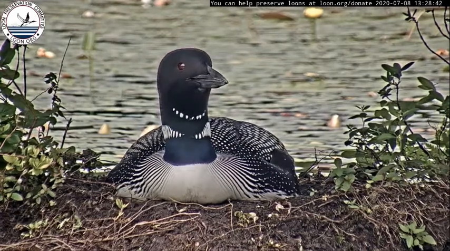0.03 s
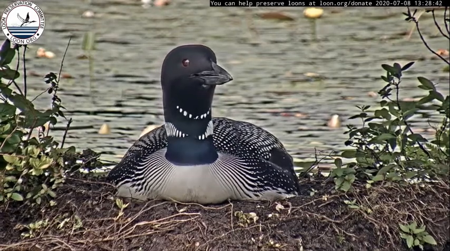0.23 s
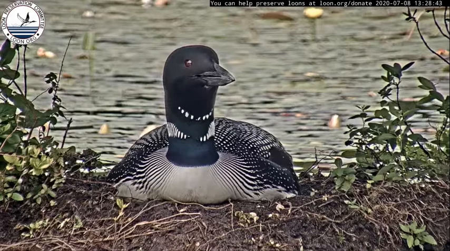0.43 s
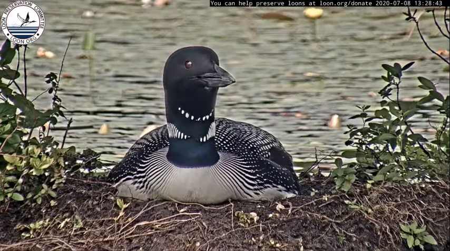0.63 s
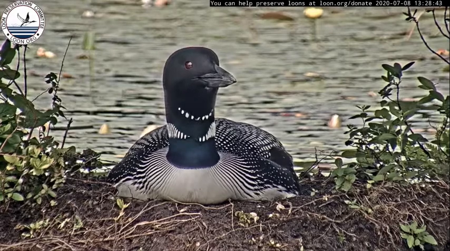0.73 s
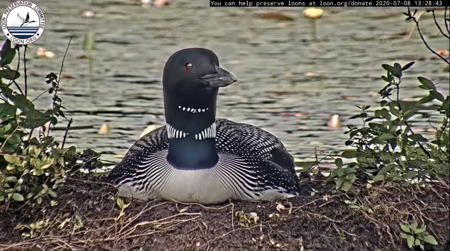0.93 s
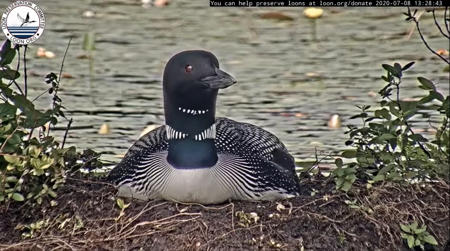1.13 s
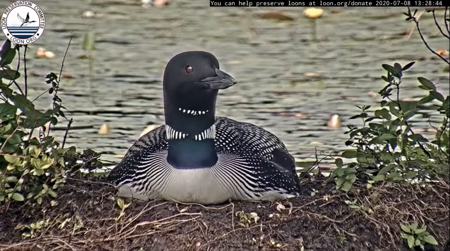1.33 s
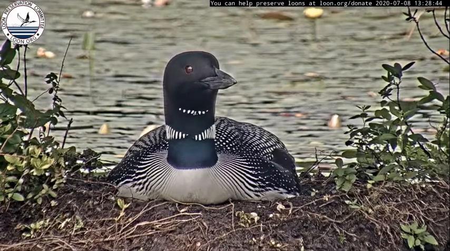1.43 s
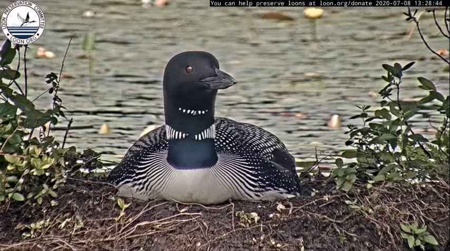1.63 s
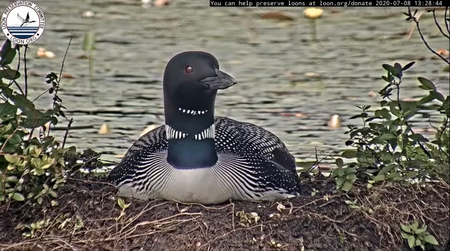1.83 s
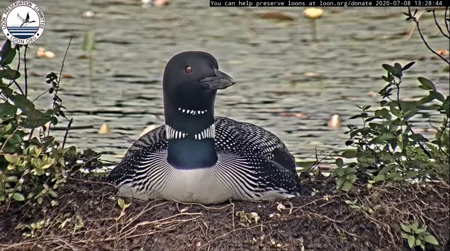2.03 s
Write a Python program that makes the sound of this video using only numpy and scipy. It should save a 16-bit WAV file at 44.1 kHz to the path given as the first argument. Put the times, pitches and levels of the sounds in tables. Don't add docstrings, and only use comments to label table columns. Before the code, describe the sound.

A loon's single loud wail dominates, close and nearly dry. A faint songbird slurs downward at 0 s over quiet lake hiss. The wail rises softly at 0.13, jumps to a low note at 0.2, flips to a long high note from 0.38 to 0.93, with a tiny click at 0.52, then falls and stops near 1.03. Faint wavering echoes follow, with distant trilling at 1.25, peeps and chips from 1.6, and a falling whistle near 2.

```python
import sys
import numpy as np
from scipy import signal
from scipy.io import wavfile
from scipy.ndimage import uniform_filter1d

SR = 44100
rng = np.random.default_rng(int(sys.argv[2]) if len(sys.argv) > 2 else 0)


def transcribe(u):
    v = np.clip(np.atleast_2d(u).T, -1, 1)
    q = np.round(v * 32767).astype(np.int16)
    wavfile.write(sys.argv[1], SR, q)


def voltage_ratio(level):
    return 10 ** (np.asarray(level, float) / 20)


N = 92610
STUTTER_S = .5233


def curve(rows, col):
    rows = np.array(rows)
    return np.interp(np.arange(N) / SR, rows[:, 0], rows[:, col])


def band(x, hz, width):
    return signal.lfilter(*signal.iirpeak(hz, hz / width, SR), x)


def unit(x):
    return x / np.sqrt(np.mean(x ** 2))


def walk(rate):
    k = int(SR / rate)
    steps = np.repeat(rng.standard_normal(N // k + 1), k)
    return 1.5 * uniform_filter1d(uniform_filter1d(steps, k), k)[:N]


def tail(x, t60, late, top_hz):
    t = np.arange(N) / SR
    h = rng.standard_normal(N) * voltage_ratio(-60 * t / t60) * np.clip(t / late, 0, 1) ** 2
    h = signal.lfilter(*signal.butter(1, top_hz, fs=SR), h)
    return signal.fftconvolve(x, h / np.sqrt(np.sum(h ** 2)))[:N]


def whistle(rows, fade):
    t = np.arange(N) / SR
    since_start = t - rows[0][0] + fade / 2
    until_end = rows[-1][0] + fade / 2 - t
    gate = np.clip(np.minimum(since_start, until_end) / fade, 0, 1)
    turn = np.cumsum(uniform_filter1d(curve(rows, 1), 150)) / SR
    return np.sqrt(2) * gate * voltage_ratio(curve(rows, 2)) * np.sin(2 * np.pi * turn)


# (frequency [Hz], level per Hz [dB])
LAKE_SPECTRUM = [(15, -33), (25, -11), (127, -2.5), (632, -17), (922, -15.5), (1060, -33), (1280, -28.5),
                 (2310, -19.5), (7000, -42), (9100, -64), (15400, -120)]
LAKE_DB = -65


def lake():
    out, swell, shape = 0, walk(3.6), np.array(LAKE_SPECTRUM)
    for hz in 30 * 2 ** np.arange(0, 8.1, .5):
        db = np.interp(np.log(hz), np.log(shape[:, 0]), shape[:, 1]) + 10 * np.log10(hz)
        flicker_db = 0.57 + 0.63 * (hz < 300)
        db = db + 0.67 * swell + flicker_db * walk(10)
        out = out + voltage_ratio(db) * unit(band(rng.standard_normal(N), hz, hz / 3))
    return voltage_ratio(LAKE_DB) * unit(out)


# (time [s], level [dB])
CHIPS = [(1.686, -73), (1.808, -74), (1.928, -75), (2.05, -77)]
CHIP_S, CHIP_TOP_HZ, CHIP_END_HZ, CHIP_BEND_S = .028, 5350, 3200, .017


def chips():
    out = 0
    for s, db in CHIPS:
        rows = []
        for u in np.linspace(0, CHIP_S, 8):
            hz = CHIP_END_HZ + (CHIP_TOP_HZ - CHIP_END_HZ) * np.exp(-u / CHIP_BEND_S)
            rows.append((s + u, hz, db - 2.0 + 3 * u / CHIP_S))
        out = out + whistle(rows, 0.0039)
    return out


# (time [s], level [dB])
PEEPS = [(1.62, -77.5), (1.71, -89), (1.74, -78), (1.875, -76), (1.906, -78.5)]
PEEP_S, PEEP_HZ = 0.013, 2340


def peeps():
    return sum(whistle([(s, PEEP_HZ, db), (s + PEEP_S, PEEP_HZ, db)], .008) for s, db in PEEPS)


# (time [s], pitch [Hz], level [dB])
SLUR_A = [(0.0, 2630, -68), (0.012, 2598, -62), (0.028, 2348, -63), (0.04, 2190, -69), (0.086, 1815, -71.5),
          (0.124, 1600, -73.5), (0.135, 1540, -79.5)]
SLUR_B = [(1.945, 2900, -90), (1.958, 2918, -86), (1.976, 2839, -73), (2.005, 2720, -70.5),
          (2.028, 2560, -61), (2.067, 1993, -70.5), (2.1, 1700, -67.5)]
SLUR_C = [(.1, 4250, -82), (.11, 4250, -73), (.122, 4240, -84), (.135, 4200, -75), (.155, 4000, -88),
          (.172, 3800, -75), (.182, 3720, -83), (.193, 3650, -74), (.205, 3150, -76), (.212, 3000, -88)]
TRILLED_CALL = [(1.25, 2873, -89), (1.27, 2950, -75), (1.292, 3330, -71), (1.34, 3295, -76),
                (1.36, 3297, -66), (1.385, 3297, -68), (1.415, 3310, -74), (1.435, 3290, -85),
                (1.465, 3290, -78), (1.49, 3290, -88)]
HIGH_CALL = [(1.24, 3650, -81), (1.27, 3780, -83), (1.293, 4120, -78), (1.305, 4200, -90),
             (1.325, 4080, -79), (1.342, 4100, -92), (1.365, 4130, -79), (1.383, 4130, -92),
             (1.4, 4100, -79), (1.43, 3720, -83), (1.46, 3660, -78), (1.483, 3600, -80), (1.495, 3450, -78),
             (1.51, 3400, -86)]
TRILL_HZ, TRILL_DEPTH = 154, 0.54
WOOD_DB, WOOD_T60_S = -9.5, 1


def songbirds():
    out = sum(whistle(rows, 0.00789) for rows in (SLUR_A, SLUR_B, SLUR_C, HIGH_CALL))
    trill_turn = np.cumsum(TRILL_HZ * (1 + 0.11 * walk(17))) / SR
    out = out + whistle(TRILLED_CALL, .008) * (1 + TRILL_DEPTH * np.sin(2 * np.pi * trill_turn))
    out = out * voltage_ratio(1.2 * walk(40))
    out = out + chips() + peeps()
    return out + voltage_ratio(WOOD_DB) * tail(out, WOOD_T60_S, 0.015, 5000)


# (time [s], level [dB])
FAR_SWAY = [(1.04, 1), (1.09, -1), (1.124, -8.5), (1.15, 3), (1.22, 1), (1.26, -2), (1.3, -2.5), (1.38, 0),
            (1.5, -4), (1.54, 0.5), (1.59, -6), (1.655, 1), (1.69, -5), (1.75, 1.5), (1.78, -7.5), (1.9, 3),
            (2.0, -2)]


def sway_far(x):
    return voltage_ratio(curve(FAR_SWAY, 1)) * x


# (delay [s], level [dB])
FAR_ECHOES = [(.21, -52.5), (.33, -55.5), (.52, -45), (.75, -54.5), (1.05, -58.5)]
FAR_HZ, FAR_WIDTH_HZ = 950, 170


def far_echoes(call):
    echoes = sum(voltage_ratio(db + .6 * walk(13)) * np.roll(call, int(s * SR)) for s, db in FAR_ECHOES)
    return band(echoes, FAR_HZ, FAR_WIDTH_HZ)


REEDS_DB, REEDS_T60_S, REEDS_HZ = -29, 1.3, 2800


def reeds(call):
    treble = band(band(call, REEDS_HZ, 900), REEDS_HZ, 900)
    return voltage_ratio(REEDS_DB) * tail(treble, REEDS_T60_S, .03, 7600)


SHORE_DB, SHORE_T60_S, SHORE_LATE_S, SHORE_HZ = -50.5, 3.2, 0.087, 2000


def shore(call):
    return voltage_ratio(SHORE_DB) * tail(call, SHORE_T60_S, SHORE_LATE_S, SHORE_HZ)


# (delay [s], level [dB])
NEAR_ECHOES = [
    (.006, -20),
    (.04, -32),
]


def near_echoes(call):
    return sum(voltage_ratio(db) * np.roll(call, int(s * SR)) for s, db in NEAR_ECHOES)


# (time [s], from [Hz], to [Hz], length [s], level [dB])
RATTLE = [(0.395, 155, 192, .075, -65), (.385, 375, 385, .045, -61), (0.392, 513, 484, 0.069, -67),
          (.47, 242.4, 234, .05, -66), (0.546, 175.6, 215, .03, -68.5), (0.57, 310, 342, .075, -64.5)]
RATTLE_OCTAVE_DB = (5.5, -19.5, -18.5, -2.5, 0.5, -21.5)


def throat_rattle():
    out = 0
    for (s, start_hz, end_hz, length, db), octave_db in zip(RATTLE, RATTLE_OCTAVE_DB):
        for k in (1, 2):
            level = db + octave_db * (k - 1)
            out = out + whistle([(s, k * start_hz, level), (s + length, k * end_hz, level)], .015)
    return out


# (frequency [Hz], width [Hz], level [dB])
RASP = [(740, 250, 3), (3900, 1500, 0.5), (5200, 500, -1.5), (6560, 500, -12)]
RASP_PATCHY_DB = 3


def breath_rasp():
    out = 0
    for hz, width, db in RASP:
        patches = voltage_ratio(db + RASP_PATCHY_DB * walk(38))
        out = out + patches * band(band(rng.standard_normal(N), hz, width), hz, width)
    return unit(out)


JITTER, STUTTER_TURN = .0006, -.11


def note_turns(notes, breaks):
    turns = []
    for k, rows in enumerate(notes):
        hz = uniform_filter1d(curve(rows, 1), 441) * (1 + JITTER * walk(60))
        turn = np.cumsum(hz) / SR
        i = int((breaks[k][0] + .0015) * SR)
        meet = turns[-1][i] + .5 if k else 0
        turns.append(turn - turn[i] + meet)
    start = STUTTER_TURN - turns[2][int(STUTTER_S * SR)]
    return [turn + start for turn in turns]


# (time [s], pitch [Hz], level [dB], overtone strength [dB])
RISE = [(0.137, 428, -43, 3.5), (0.153, 454, -39.5, 9), (0.189, 537.4, -37, -3), (0.198, 559, -37, -5)]
LOW = [(.2, 655, -27, -16), (.208, 707.4, -24.5, -9.5), (.22, 710.8, -20.5, -7.5), (.25, 721, -19, 0.5),
       (.292, 737.2, -15.5, -1), (.33, 753, -14, -3.5), (0.358, 763.5, -13, -0.5), (.372, 779.4, -14, -4)]
HIGH = [(.385, 911.6, -19, -0.5), (.44, 922, -18.5, 3), (0.499, 932.2, -17.5, 0.5),
        (0.571, 936.1, -17, 1.5), (.68, 940.3, -17, -1), (.78, 938.8, -16.5, -1), (0.841, 922.5, -18, 0),
        (.895, 908.4, -19, -2), (.926, 891.3, -19, -16)]
FALL = [(0.933, 740, -16.5, -12.5), (0.949, 711.7, -18, 0), (0.978, 698.7, -20, -5.5),
        (0.999, 677.6, -23.5, 1.5), (1.012, 669.3, -24, -1.5), (1.02, 651, -27, -3),
        (1.026, 653, -33, -3.5), (1.033, 651, -48.5, -5)]
NOTES = (RISE, LOW, HIGH, FALL)
# (starts [s], swells in [s], stops [s], dies away in [s])
BREAKS = [
    (0.132, 0.0089, 0.2, 0.0028),
    (.197, 0.0047, 0.38, 0.0047),
    (.377, 0.002, .925, 0.0069),
    (0.9296, 0.0045, 1.0295, 0.0032),
]
OVERTONES = [(-3.5, -30.5, -54, -56, -55.5, -54.5, -58.5, -59, -56),
             (-28.5, -48.5, -32.5, -46.5, -48.5, -43.5, -63, -57.5, -61.5),
             (-50.5, -23, -29.5, -27, -51, -53.5, -65, -80, -90.5),
             (-18, -47, -40.5, -40.5, -46.5, -49.5, -50.5, -55.5, -70.5)]
OVERTONE_DRIFT = [(-5, 0.5, 4, -0.5, 4.5, 1, 2, 1.5, 0), (-11.5, 3.5, -19, 8, 14, 3, 11.5, -4, -5.5),
                  (-7.5, -1.5, -2.5, -3.5, 7, -4.5, 0.5, 0, 0),
                  (4.5, -18, -35.5, -17, -1, -3, -21.5, -9, -3.5)]
# (rasp at start against note [dB], rasp fade [dB/s], overtone 2's share of the strength)
VOICING = [(-60, 0, 1), (-36, 90, .2), (-44, 18, .3), (-49, 100, .2)]
HOARSE_DB = (2, 6, 1.5, 2)
HOARSE_PER_S, HOARSE_FADE_S = 350, .1
WAVER_DB, WAVER_PER_S = 1.5, 14
SHIMMER_DB, SHIMMER_PER_S = .025, 500


def sing_note(k, turn, rasp):
    t = np.arange(N) / SR
    on, swell, off, die = BREAKS[k]
    rasp_db, rasp_fade, follow = VOICING[k]
    phase = 2 * np.pi * turn
    age = np.clip(t - on, 0, 1)
    gate = (1 - np.exp(-(age / swell) ** 2)) * np.exp(-np.clip(t - off, 0, 1) / die)
    bright = uniform_filter1d(curve(NOTES[k], 3), 441)
    along = np.clip((t - on) / (off - on), 0, 1) - .5
    hoarse = HOARSE_DB[k] * np.exp(-age / HOARSE_FADE_S)
    upper = 0
    for j, mid_db in enumerate(OVERTONES[k]):
        db = mid_db + (1 if j else follow) * bright + OVERTONE_DRIFT[k][j] * along
        db = db + WAVER_DB * walk(WAVER_PER_S)
        db = db + hoarse * min(j / 4, 1) * walk(HOARSE_PER_S)
        upper = upper + voltage_ratio(db) * np.cos((j + 2) * phase)
    fundamental = voltage_ratio(SHIMMER_DB * walk(SHIMMER_PER_S)) * np.cos(phase)
    breath = voltage_ratio(rasp_db - rasp_fade * age) * rasp
    level = voltage_ratio(uniform_filter1d(curve(NOTES[k], 2), 441))
    return gate * level * (np.sqrt(2) * (fundamental + upper) + breath)


def loon():
    turns = note_turns(NOTES, BREAKS)
    rasp = breath_rasp()
    return sum(sing_note(k, turn, rasp) for k, turn in enumerate(turns)) + throat_rattle()


def scene():
    call = loon()
    far = far_echoes(call)
    scattered = reeds(call)
    far = sway_far(far + shore(call))
    return (call + near_echoes(call) + far + scattered + songbirds() + lake())[None]


MIC_TOP_HZ, HISS_DB, OFFSET = 7180, -100, -.0008
REPEAT = 16


def top_cut(x):
    return signal.sosfilt(signal.butter(12, 15750, fs=SR, output="sos"), x)


def record(dry):
    low_pass = signal.cheby2(10, 30, MIC_TOP_HZ * 1.1, fs=SR, output="sos")
    x = signal.sosfiltfilt(low_pass, dry)
    i = np.arange(N)
    x = x[:, i - REPEAT * (i >= int(STUTTER_S * SR))]
    x = x + voltage_ratio(HISS_DB) * rng.standard_normal(dry.shape) + OFFSET
    return top_cut(x)


dry = scene()
out = record(dry)
transcribe(out)
```